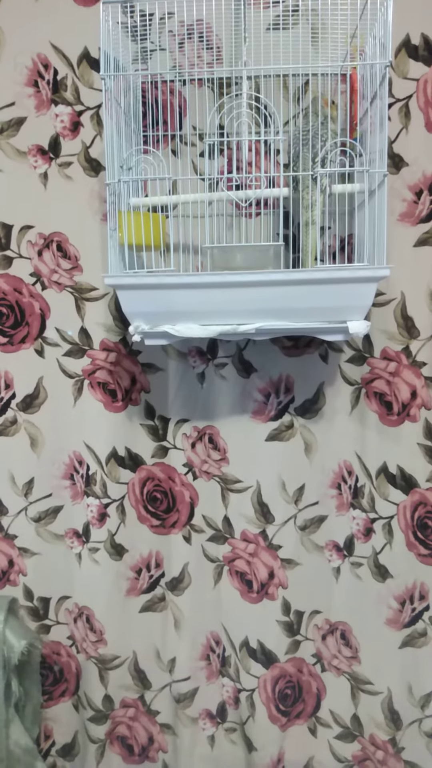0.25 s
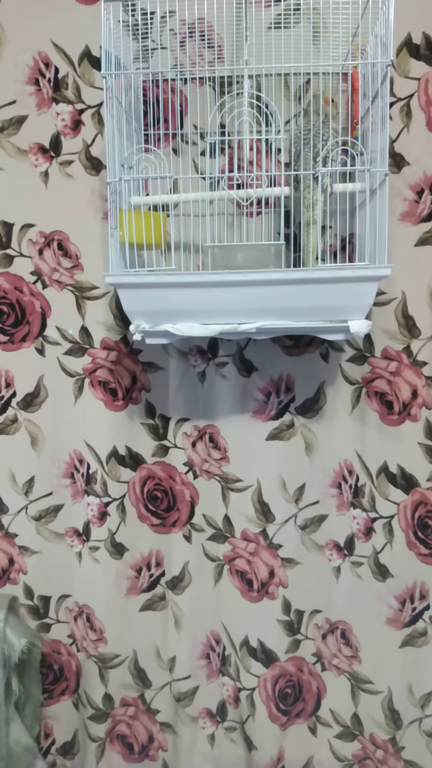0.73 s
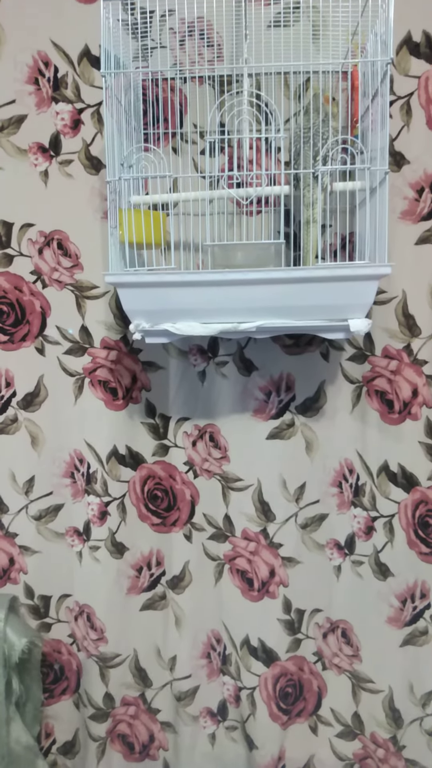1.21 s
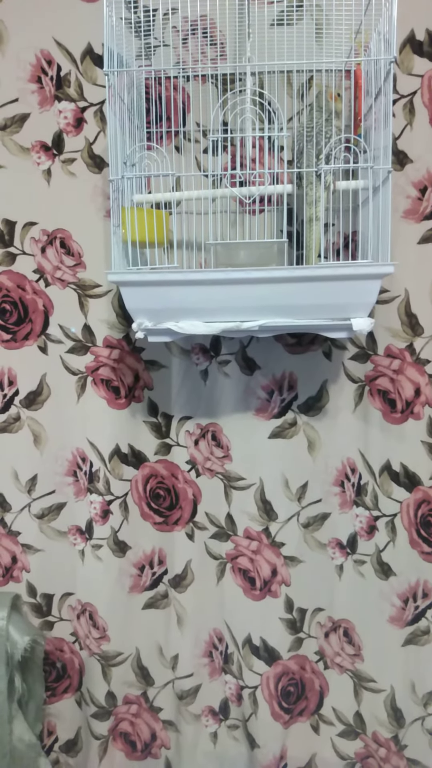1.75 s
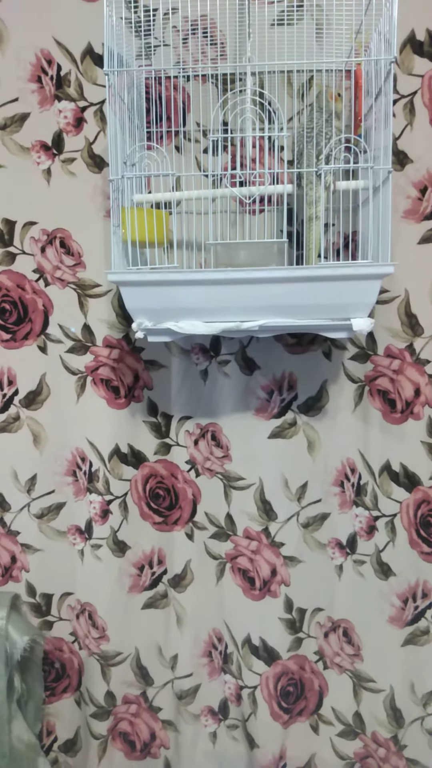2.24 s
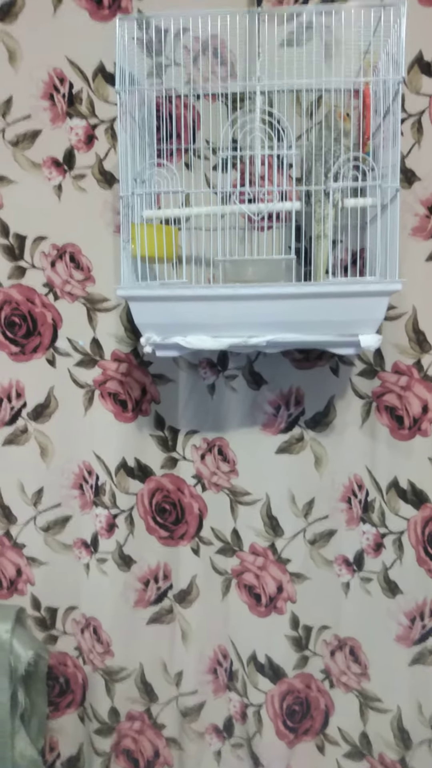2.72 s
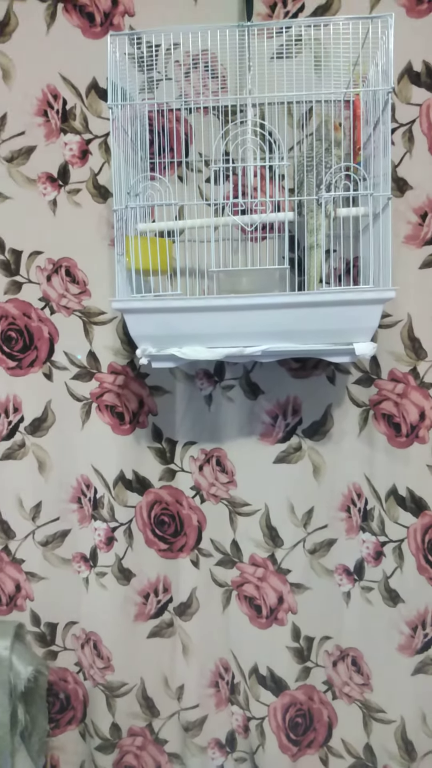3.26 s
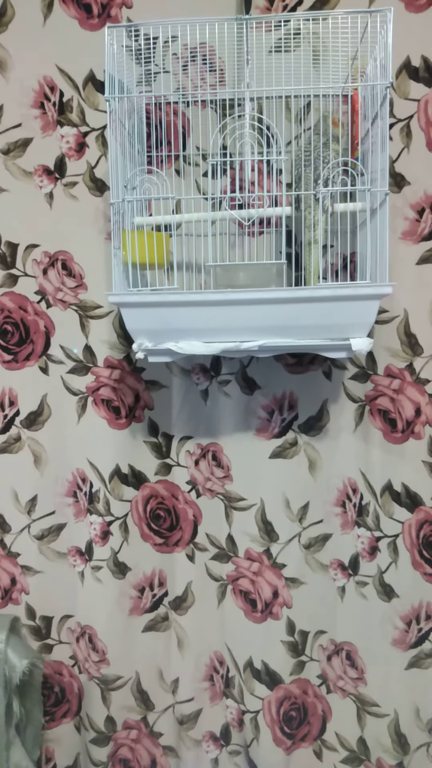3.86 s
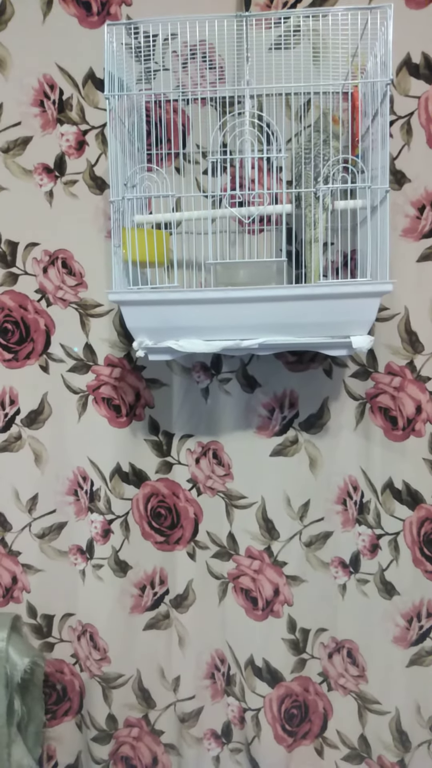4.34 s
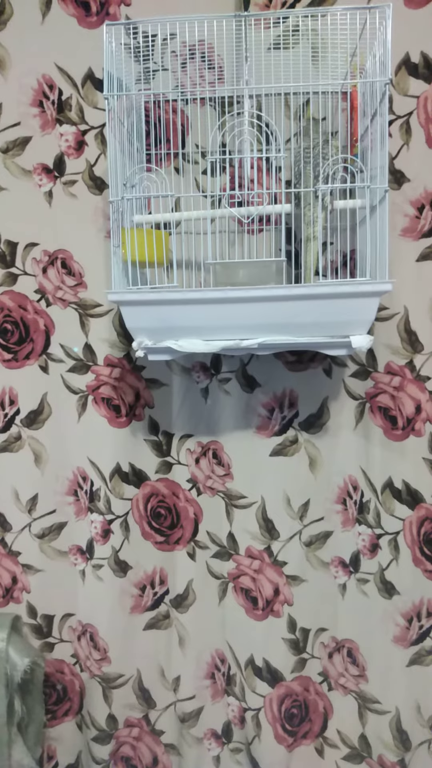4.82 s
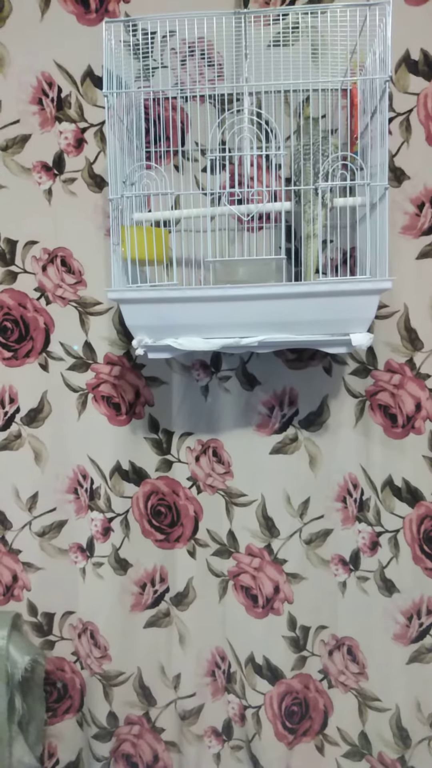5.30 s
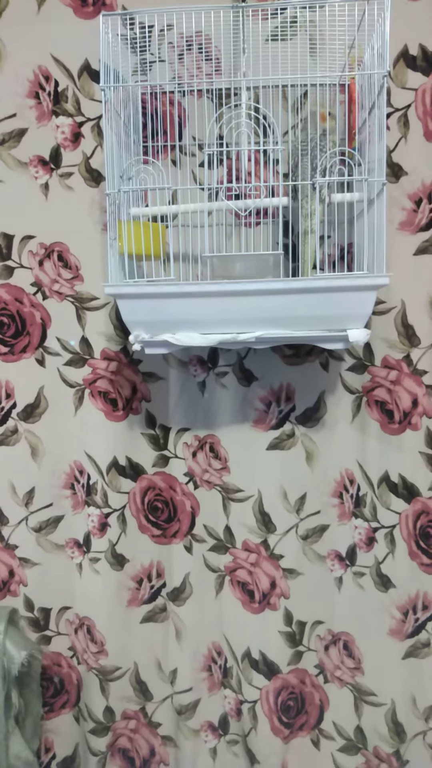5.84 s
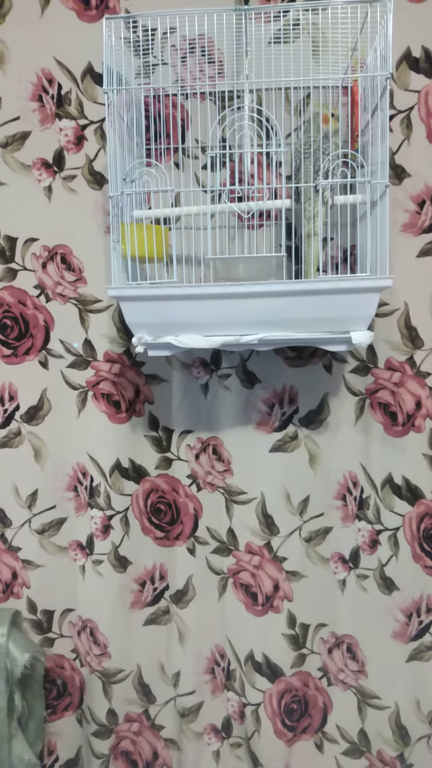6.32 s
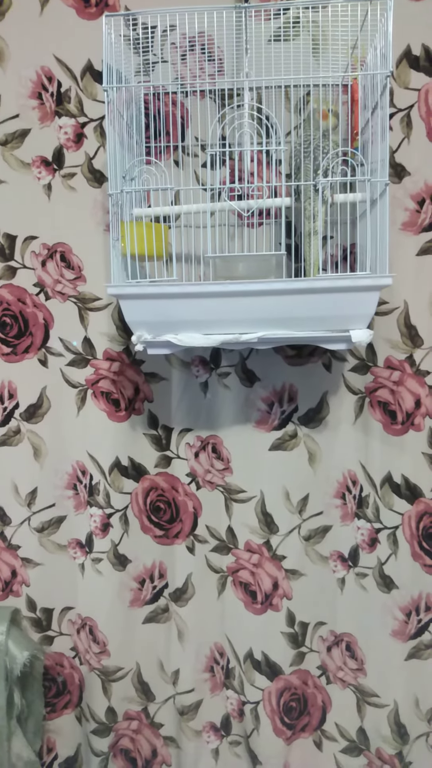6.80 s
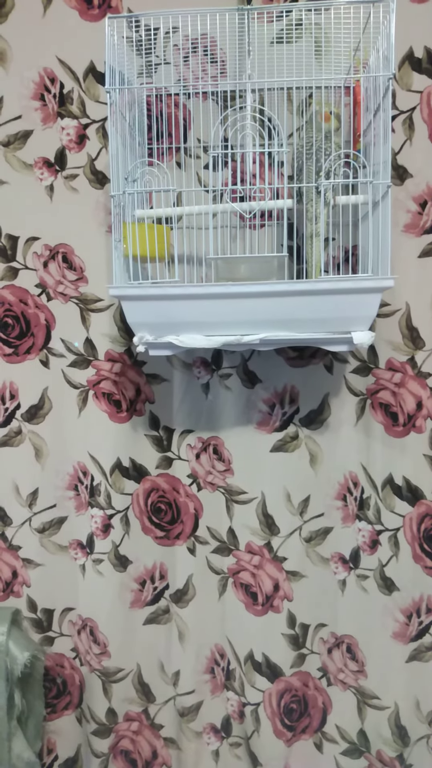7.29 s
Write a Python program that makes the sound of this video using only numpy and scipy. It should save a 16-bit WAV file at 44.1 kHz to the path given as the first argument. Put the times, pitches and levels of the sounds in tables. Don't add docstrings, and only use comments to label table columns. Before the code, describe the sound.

In a bare, humming room, a small parrot whistles sharply up and down, rasps, mutters, clucks four times, then squawks and coos amid feather rustles.

```python
import sys
import numpy as np
from scipy import signal
from scipy.fft import rfft, irfft, next_fast_len
from scipy.io import wavfile
from scipy.ndimage import uniform_filter1d

SR = 44100
rng = np.random.default_rng(int(sys.argv[2]) if len(sys.argv) > 2 else 0)


def makeup_ratio(level_db):
    decades = np.asarray(level_db, float) / 20
    return 10 ** decades


def persist_wave(psi):
    counts = np.round(np.clip(psi, -1, 1) * 32767).astype(np.int16)
    wavfile.write(sys.argv[1], SR, np.atleast_2d(counts).T)


N = 333396


def colour(x, points):
    size = next_fast_len(len(x))
    hz, db = np.transpose(points)
    bin_hz = np.arange(size // 2 + 1) * SR / size
    gain = makeup_ratio(np.interp(np.log(bin_hz + 1), np.log(hz), db))
    return irfft(rfft(x, size) * gain, size)[:len(x)]


def unit(x):
    return x / np.sqrt(np.mean(x ** 2))


def band(x, hz, width_hz):
    edges = [max(hz - width_hz / 2, 20), min(hz + width_hz / 2, 0.48 * SR)]
    return signal.sosfilt(signal.butter(2, edges, "bandpass", fs=SR, output="sos"), x)


def drift(size):
    return unit(uniform_filter1d(uniform_filter1d(rng.standard_normal(N), size), size))


def add(out, x, s):
    i = max(int(s * SR), 0)
    out[i:i + len(x)] += x[:N - i]


# (peak place/share of length, start level/dB under peak, end level/dB under peak)
EVEN_SWELL = (0.41, -1, -1)
ROUND_SWELL = (0.27, -11.5, -11)
SNAP_SWELL = (.4, -1.5, -4)


def glides(rows, swell, voice):
    share, start_db, end_db = swell
    calls = []
    for s, length, start_hz, end_hz, db in rows:
        start = (s, start_hz, db + start_db)
        peak = (s + share * length, start_hz + share * (end_hz - start_hz), db)
        end = (s + length, end_hz, db + end_db)
        calls.append(([start, peak, end], voice))
    return calls


# (t/s, length/s, start f/Hz, end f/Hz, peak level/dB)
HONKS = [(0, 0.066, 1355, 1350, -36.5)]
SCRATCHES = [
    (.097, 0.03, 1319, 1322, -40),
    (4.066, 0.053, 1350, 1361, -43),
    (4.2, 0.067, 1436, 1289, -70),
]
LOWS = [
    (.135, 0.0515, 1356, 1287, -45.5),
    (6.68, 0.054, 1330, 1238, -43),
]
# (t/s, f/Hz, level/dB)
DRAWL = [(.262, 1228, -52), (.28, 1348, -41.5), (.32, 1347, -41), (.37, 1343, -39.5), (.41, 1369, -40.5),
         (.45, 1341, -49.5), (.48, 1300, -51.5), (.53, 1350, -85)]
# (peak place/share of length, start level/dB under peak, end level/dB under peak)
FADING_SWELL = (0.1, -0.62, -24)
# (overtone slope/dB, throat resonance/multiple of pitch, roughness/0-1)
NASAL_VOICE = [(-1.5, 2.0, 0.11), (4.5, 2.0, 0)]
SCRATCH_VOICE = [(-6, 3.3, .4), (-7, 4.8, 0.29)]
LOW_VOICE = [(-12.5, 2.6, 0.094), (1, 0.67, 0.11)]
DRAWL_VOICE = [(-5.5, 1.5, 0.034), (2, 2.1, 0.037), (-6, 3.9, 0.043), (-13, 1.5, 0.053), (-18, 0.55, .05)]


def nasal_notes():
    return (glides(HONKS, FADING_SWELL, NASAL_VOICE) + glides(SCRATCHES, EVEN_SWELL, SCRATCH_VOICE)
            + glides(LOWS, ROUND_SWELL, LOW_VOICE) + [(DRAWL, DRAWL_VOICE)])


# (t/s, length/s, start f/Hz, end f/Hz, peak level/dB)
CROAKS = [
    (1.30, 0.013, 1467, 1542, -68),
    (2.168, .03, 1890, 1650, -56),
    (2.222, 0.056, 1676, 1418, -59),
    (2.812, 0.13, 1200, 1074, -46.5),
]
CREAKS = [(1.80, .052, 1526, 1783, -42)]
STAIRS = [
    (1.854, .024, 2040, 2150, -33.5),
    (1.884, 0.0075, 2300, 2420, -25.5),
    (1.90, 0.029, 2620, 2780, -25.5),
]
PEEPS = [(1.927, 0.015, 2837, 3176, -18)]
# (t/s, f/Hz, level/dB)
RISE = [(1.326, 1664, -55.5), (1.343, 1721, -36.5), (1.352, 1910, -48), (1.365, 2393, -31.5),
        (1.4, 2840, -33), (1.408, 2992, -22.5), (1.42, 3180, -24.5), (1.432, 3433, -24),
        (1.438, 3320, -26.5)]
CREST = [(1.946, 3409, -37.5), (1.958, 3900, -33), (1.972, 4250, -31.5), (1.99, 4600, -27),
         (2.005, 4500, -36), (2.027, 4538, -29), (2.047, 4657, -28.5), (2.058, 4412, -36)]
DIVE = [(2.07, 3765, -38), (2.078, 3425, -29.5), (2.088, 3192, -27), (2.1, 3071, -30), (2.108, 3030, -41.5)]
SLIDE = [(2.11, 2960, -44), (2.128, 3188, -26.5), (2.15, 2882, -26.5), (2.18, 2600, -40),
         (2.215, 2520, -22), (2.25, 2223, -42), (2.33, 1950, -43.5), (2.37, 1857, -61)]
# (peak place/share of length, start level/dB under peak, end level/dB under peak)
BUILDING_SWELL = (1, -24.5, -0.57)
PEAKING_SWELL = (0.6, -10, -9)
# (overtone slope/dB, throat resonance/multiple of pitch, roughness/0-1)
CROAK_VOICE = [(-26, 0.44, 0.28), (-23, 0.86, 0.1)]
RISE_VOICE = [(-3, 1.03, 0.124), (-10, 1.0, .07), (-10.5, 0.59, 0.007)]
CREAK_VOICE = [(-9.5, 1.3, 0.38), (-13, 1.2, 0.13)]
STEP_VOICE = [(-17.5, 1.02, .05), (-14.5, 1.0, 0.023)]
PURE_VOICE = [(-30, 0.95, 0.3), (-44, 1.0, 0.2), (-32.5, 1.0, 0.15), (-25.5, 0.96, 0.049)]
DIVE_VOICE = [(-13.5, 1.0, .02), (-12, 0.97, 0.045)]
SLIDE_VOICE = [(-16, 0.77, 0.059), (-14, 1.0, 0.12), (-17, 0.88, .05), (-30.5, 0.99, 0.034)]


def whistles():
    short = glides(CROAKS, SNAP_SWELL, CROAK_VOICE) + glides(CREAKS, BUILDING_SWELL, CREAK_VOICE)
    short += glides(STAIRS, EVEN_SWELL, STEP_VOICE) + glides(PEEPS, PEAKING_SWELL, STEP_VOICE)
    return short + [(RISE, RISE_VOICE), (CREST, PURE_VOICE), (DIVE, DIVE_VOICE), (SLIDE, SLIDE_VOICE)]


# (t/s, f/Hz, level/dB)
RASP = [(2.808, 1800, -43.5), (2.87, 1750, -42.5), (2.92, 1700, -49.5), (2.97, 1740, -50),
        (2.994, 1480, -44)]
WARBLE = [(2.996, 1455, -39.5), (3.004, 1705, -29.5), (3.016, 1606, -31.5), (3.028, 1515, -41),
          (3.046, 1826, -32), (3.052, 1705, -39)]
GRUMBLE = [(3.05, 1519, -42.5), (3.066, 1655, -40), (3.088, 1529, -39.5), (3.11, 1703, -38),
           (3.14, 1682, -46.5), (3.18, 1636, -40.5), (3.217, 1604, -44)]
SHRIEK = [(3.218, 1580, -39), (3.234, 1802, -27.5), (3.24, 1926, -21.5), (3.246, 2157, -29.5)]
RING = [(3.247, 2180, -27), (3.253, 2230, -25.5), (3.258, 2320, -15.5), (3.264, 2300, -19),
        (3.272, 2280, -33.5), (3.287, 2330, -23.5), (3.295, 2330, -35)]
# (overtone slope/dB, throat resonance/multiple of pitch, roughness/0-1)
RASP_VOICE = [(0, 4.3, 0.98), (0, 2.4, .45)]
WARBLE_VOICE = [(-1.5, 2.8, .015), (0.031, 1.8, 0.025)]
HOARSE_VOICE = [(-0.987, 2.2, .04), (-0.11, 3.7, 0.91), (0.035, 2.2, .75)]
SHRIEK_VOICE = [(-1.5, 9, 0.036), (1, 1.9, .04), (-0.83, 3.6, 0.22)]
RING_VOICE = [(0, 2.02, 0.058), (0, 1.97, 0.17)]


def rasps():
    return [(RASP, RASP_VOICE), (WARBLE, WARBLE_VOICE), (GRUMBLE, HOARSE_VOICE),
            (SHRIEK, SHRIEK_VOICE), (RING, RING_VOICE)]


# (t/s, f/Hz, level/dB)
MUTTER = [(3.733, 655, -41.5), (3.76, 585, -55), (3.80, 616, -44), (3.825, 623.4, -38), (3.845, 699, -34),
          (3.862, 905.4, -39.5), (3.876, 1091, -39), (3.888, 972, -59), (3.905, 1132, -45.5),
          (3.918, 1068, -63)]
CHIRP = [(3.953, 1649, -32), (3.958, 1522, -34), (3.975, 1381, -41.5), (3.99, 1097, -46.5)]
HUM = [(4.225, 1200, -67), (4.262, 1200, -49), (4.305, 1273, -44), (4.335, 1226, -46)]
WHINE = [(4.335, 1215, -51.5), (4.355, 1225, -51.5), (4.372, 1269, -44.5), (4.397, 1185, -52.5),
         (4.41, 1262, -55.5), (4.428, 1152, -56.5), (4.437, 1175, -70.5)]
# (t/s, length/s, start f/Hz, end f/Hz, peak level/dB)
CHIPS = [(4.016, .014, 1488, 1450, -56)]
COOS = [
    (4.113, 0.042, 1350, 1330, -37),
    (6.78, .07, 1251, 1157, -41),
    (6.883, .025, 1170, 1180, -39),
]
# (t/s, length/s, start f/Hz, end f/Hz, peak level/dB)
STRAYS = [
    (4.2, 0.083, 5520, 5740, -62),
    (6.775, 0.027, 2284, 2528, -54),
    (7.04, 0.04, 3317, 3304, -72.5),
    (7.06, 0.027, 2650, 2750, -70),
]
# (overtone slope/dB, throat resonance/multiple of pitch, roughness/0-1)
MUTTER_VOICE = [(-7, 2.0, 0.094), (-3.5, 2.1, 0.023), (-7.5, 1.8, 0.026), (-6, 2.0, 0.018),
                (-15, 2.05, .03)]
CHIP_VOICE = [(-7, 1.1, 0.028), (-4, 2, 0.06)]
COO_VOICE = [(-24.5, 1.02, .05), (-23.5, 1.0, .05)]
HUM_VOICE = [(-17, 0.82, 0.097), (-12, 1.3, 0.086)]
WHINE_VOICE = [(-9, 1.05, 0.036), (-4.5, 4, 0.04), (-5, 3.9, 0.05), (-5, 1.8, 0.07)]


def mutters():
    short = glides(CHIPS, SNAP_SWELL, CHIP_VOICE)
    short += glides(COOS, ROUND_SWELL, COO_VOICE) + glides(STRAYS, ROUND_SWELL, COO_VOICE)
    return short + [(MUTTER, MUTTER_VOICE), (CHIRP, CHIP_VOICE), (HUM, HUM_VOICE), (WHINE, WHINE_VOICE)]


# (t/s, length/s, middle f/Hz, peak level/dB, throat resonance/multiple of pitch)
CLUCKS = [
    (4.5205, 0.0057, 1694, -38.5, 2.3),
    (4.673, .006, 1492, -51, 1.05),
    (4.6735, .0055, 2858, -48.5, 2.05),
    (4.834, 0.0062, 1947, -43.5, 1.8),
    (4.982, 0.0072, 1498, -39.5, 2.2),
]
# (peak place/share of length, start level/dB over peak, end level/dB over peak)
CLUCK_SWELL = (0.15, 0.5, 3)


def clucks():
    drop, slope_db, rough = 0.17, -1, 0.081
    calls = []
    for s, length, hz, db, throat in CLUCKS:
        row = (s, length, hz * (1 + drop), hz * (1 - drop), db)
        calls += glides([row], CLUCK_SWELL, [(slope_db, throat, rough)] * 2)
    return calls


# (t/s, f/Hz, level/dB)
SQUAWK = [(6.545, 1472, -43), (6.556, 1481, -38.5), (6.568, 1816, -21.5), (6.584, 2218, -25),
          (6.589, 2190, -34)]
SIGH = [(6.922, 1125, -43), (6.95, 1105, -36.5), (6.99, 1100, -36.5), (7.035, 1105, -41.5),
        (7.055, 1130, -49), (7.085, 1160, -56), (7.115, 1230, -57), (7.125, 1290, -61)]
# (overtone slope/dB, throat resonance/multiple of pitch, roughness/0-1)
SQUAWK_VOICE = [(-4.5, 5.5, 0.48), (-4, 1.7, 0.035), (2.5, 0.67, 0.039)]
SIGH_VOICE = [(-45, 1.6, .04), (-56, 0.72, .04), (-28, 0.43, .04), (-19, 1.05, .1)]


def squawk_and_sigh():
    return [(SQUAWK, SQUAWK_VOICE), (SIGH, SIGH_VOICE)]


# (f/Hz, level/dB)
BEAK = [(500, -45), (900, -21.5), (1200, -6.5), (2300, -4), (3200, 3), (3700, -2), (4150, -3.5),
        (4700, -0.5), (5600, 4), (7000, -13.5), (8000, -19), (9600, -21), (11500, -17.5), (14000, -30),
        (17000, -44)]


def bird():
    throat_db, throat_octaves = 10.5, 0.54
    out, breath = np.zeros(N), rng.standard_normal(N)
    waver, flutter, puff = drift(size=20), drift(size=120), drift(size=22)
    wobble, tremble = drift(size=500), drift(size=350)
    order = np.arange(1, 13)[:, None]
    song = nasal_notes() + whistles() + rasps() + mutters() + clucks() + squawk_and_sigh()
    for note, voice in song:
        s, *columns = np.transpose(note)
        i = np.arange(max(int(s[0] * SR), 0), int(s[-1] * SR))
        hz, db = (np.interp(i / SR, s, c) for c in columns)
        voice_s = np.linspace(s[0], s[-1], len(voice))
        slope_db, throat, rough = (np.interp(i / SR, voice_s, c) for c in np.transpose(voice))
        rough = np.clip(rough, 0, 1)

        hz = hz * (1 + 0.007 * (wobble[i] - wobble[i].mean()))
        db = db + 1.3 * (tremble[i] - tremble[i].mean())
        throat_hz = throat * hz
        phase = 2 * np.pi * np.cumsum(hz * (1 + 0.3 * rough * waver[i])) / SR

        overtone_hz = order * hz
        boost_db = throat_db * np.exp(-(np.log2(overtone_hz / throat_hz) / throat_octaves) ** 2)
        highness = np.clip(np.log2(overtone_hz / 7200) / 0.3, 0, 1)
        thin_db = 0.8 * np.minimum(db + 22, 0) * highness
        size = makeup_ratio(slope_db * (order - 1) + boost_db + thin_db) * (overtone_hz < 0.45 * SR)
        tone = np.sum(size * np.sin(order * phase), axis=0)
        tone = tone / np.sqrt(np.sum(size ** 2, axis=0) / 2)

        throat_air = 0.31 * puff[i] * np.sin(2 * np.pi * np.cumsum(throat_hz) / SR)
        wide_air = makeup_ratio(np.minimum(0.62 * slope_db, 0)) * breath[i]
        voiced = tone + (0.012 + 2.4 * rough) * (throat_air + wide_air)
        edge = np.clip(np.minimum(i - i[0], i[-1] - i) / (0.0019 * SR), 0, 1)
        out[i] += makeup_ratio(db + 2.5 * rough * flutter[i]) * edge * voiced
    return colour(out, BEAK)


# (t/s, level/dB, length/s, centre f/Hz, width/Hz)
RUSTLES = [(0.035, -56.5, 0.014, 8000, 7000), (0.0, -76.5, 0.07, 13500, 4000),
           (0.709, -63, 0.063, 6100, 2800), (0.886, -69.5, .015, 5100, 2620),
           (1.993, -60, 0.16, 8260, 8300), (2.345, -57, 0.06, 5270, 4000), (4.138, -63, 0.25, 5200, 3980),
           (5.35, -68.5, 0.056, 6500, 3500), (5.423, -68.5, .17, 6000, 3500),
           (5.699, -83.5, 0.64, 5280, 2368), (6.223, -71.5, 0.046, 7200, 4400),
           (6.353, -57, 0.029, 5900, 2400), (6.354, -70, .03, 8400, 4000), (6.516, -61.5, 0.11, 4400, 2500),
           (6.559, -78, 0.13, 12500, 6000), (2.808, -75.5, .12, 12500, 6500),
           (6.855, -59.5, .2, 5600, 2260), (6.873, -64, .1, 10500, 9500), (6.9, -65, .13, 6000, 2400),
           (6.91, -71, 0.18, 3100, 1800), (7.337, -77, 0.06, 5200, 3000)]


def rustles():
    out = np.zeros(N)
    grain = rng.standard_normal(N) * makeup_ratio(4.5 * drift(size=60))
    for s, db, length, hz, width_hz in RUSTLES:
        t = np.arange(int(length * SR)) / (length * SR)
        piece = grain[int(s * SR):][:len(t)]
        hiss = unit(band(band(piece, hz, width_hz), hz, width_hz))
        add(out, makeup_ratio(db) * np.minimum(t / 0.19, 1) * (1 - t) * hiss, s)
    return out


# (f/Hz, level/dB per Hz)
HUSH = [(15, -37.5), (25, -14), (55, -3.5), (93, -6), (113, -10), (240, -10.5), (349, -14.5), (422, -13),
        (762, -17.5), (1140, -24), (1710, -26.5), (2490, -30.5), (3090, -32.5), (6390, -33.5),
        (15500, -51.5)]


def hush():
    level_db = -62.5 + 0.5 * drift(size=3000)
    rumble_cut = signal.butter(4, 42, "highpass", fs=SR, output="sos")
    noise = colour(rng.standard_normal(N), HUSH)
    return makeup_ratio(level_db) * unit(signal.sosfilt(rumble_cut, noise))


# (centre f/Hz, fall by 60 dB t60/s, level/dB)
ROOM_T60 = [(926, 0.33, -1.5), (1926, 0.32, 2.38), (4000, 0.32, 2.24), (8000, 0.34, 0.5),
            (14000, 0.36, -2.5)]
# (delay t/s, level/dB)
WALLS = [(0.0042, -16), (0.025, -17), (0.033, -15.5), (0.052, -19.5), (0.062, -16.5)]


def room(x):
    gap_s, fill_s, early, bend, level_db = 0.0033, 0.022, 0.7, 0.85, 1.5
    t = np.arange(int(0.8 * SR)) / SR
    filling = (t > gap_s) * (early + 1 - np.exp(-t / fill_s))
    echoes = rng.standard_normal(len(t)) * filling
    tail = np.zeros(len(t))
    for hz, t60, db in ROOM_T60:
        tail += band(echoes, hz, 0.61 * hz) * makeup_ratio(db - 60 * (t / t60) ** bend)
    tail = makeup_ratio(level_db) * tail / np.sqrt(np.sum(tail ** 2))
    walls = np.zeros(len(t))
    for s, db in WALLS:
        add(walls, np.array([makeup_ratio(db)]), s)
    return signal.fftconvolve(x, tail + band(walls, 4800, 7300))[:N]


# (t/s, level/dB, f/Hz, ring t60/s)
KNOCKS = [(0.099, -47.5, 277, 0.07), (.592, -48.5, 269, .15), (.615, -51.5, 205, .15),
          (1.07, -53, 55, 0.18), (4.111, -52, 430, 0.15), (4.40, -58, 567, 0.14), (5.43, -57, 52.9, 0.16),
          (5.521, -54, 52, .25), (5.631, -52.5, 57, .25), (6.55, -53, 864, 0.085),
          (6.985, -53, 469.4, 0.15), (7.01, -52, 51.6, 0.22)]


def knocks():
    out = np.zeros(N)
    for s, db, hz, t60 in KNOCKS:
        t = np.arange(int(t60 * SR)) / SR
        push = 1 - np.exp(-t / 0.00093)
        add(out, makeup_ratio(db - 60 * t / t60) * push * np.sin(2 * np.pi * hz * t), s)
    return out


# (t/s, length/s, level/dB, start f/Hz, end f/Hz)
GURGLE = [
    (1.754, 0.082, -58.5, 450, 383),
    (1.78, 0.11, -61, 1120, 1027),
    (1.81, 0.077, -60.5, 770, 803),
    (1.836, .06, -48, 405, 357),
    (1.854, 0.091, -53, 710, 621),
    (1.885, .055, -56.5, 420, 330),
    (1.895, .05, -53, 300, 280),
    (1.946, 0.063, -55.5, 500, 460),
    (1.948, 0.067, -67.5, 560, 698.5),
]


def gurgle():
    out, waver = np.zeros(N), drift(size=300)
    for s, length, db, start_hz, end_hz in GURGLE:
        size = int(length * SR)
        hz = np.linspace(start_hz, end_hz, size) * (1 + 0.034 * waver[int(s * SR):][:size])
        tone = np.sin(2 * np.pi * np.cumsum(hz) / SR)
        add(out, makeup_ratio(db) * np.sqrt(np.hanning(size)) * tone, s)
    return out


def scene():
    cage = bird() + rustles() + gurgle()
    return (cage + room(cage) + knocks() + hush())[None]


def suppress(x, strength, floor_db):
    spectrum = signal.stft(x, nperseg=512)[2]
    power = uniform_filter1d(np.abs(spectrum) ** 2, size=5, axis=1)
    power = uniform_filter1d(power, size=5, axis=2)
    background = np.percentile(power, 25, axis=2, keepdims=True)
    gain = np.maximum(1 - strength * background / (power + 1e-18), makeup_ratio(floor_db))
    return signal.istft(spectrum * gain, nperseg=512)[1][:, :N]


def top_cut(x):
    return signal.sosfilt(signal.butter(12, 15670, fs=SR, output="sos"), x)


def record(dry):
    bent = dry + 0.052 * dry ** 2 - 0.15 * dry ** 3
    mix = suppress(bent, strength=0.6, floor_db=-7)
    return top_cut(mix)


dry = scene()
out = record(dry)
persist_wave(out)
```